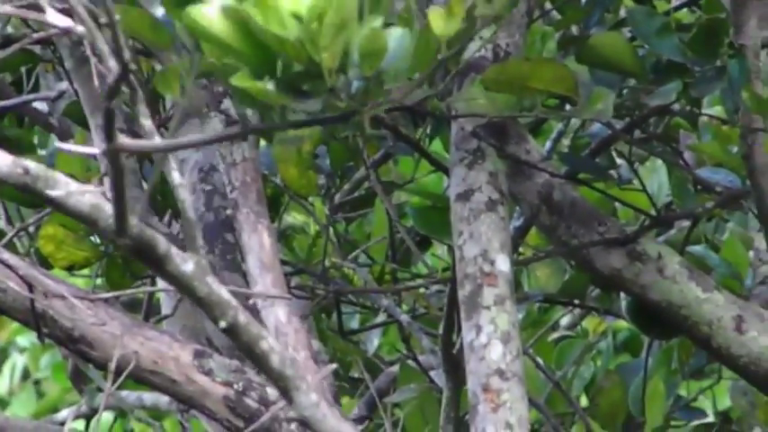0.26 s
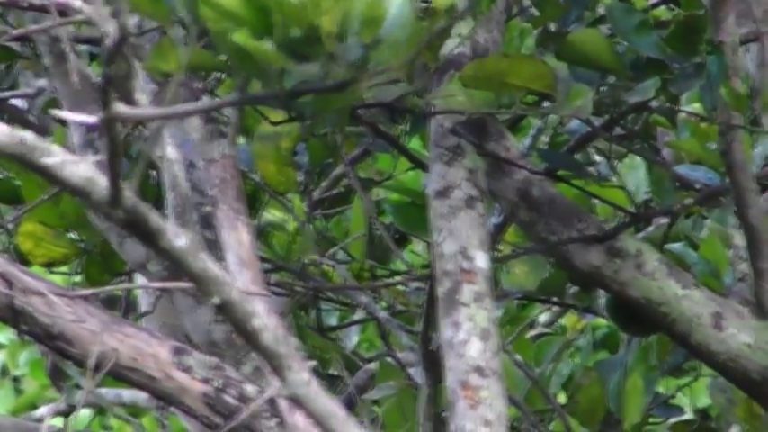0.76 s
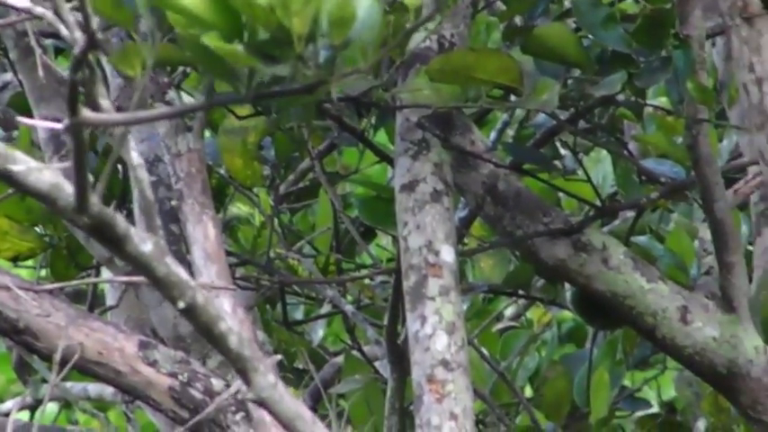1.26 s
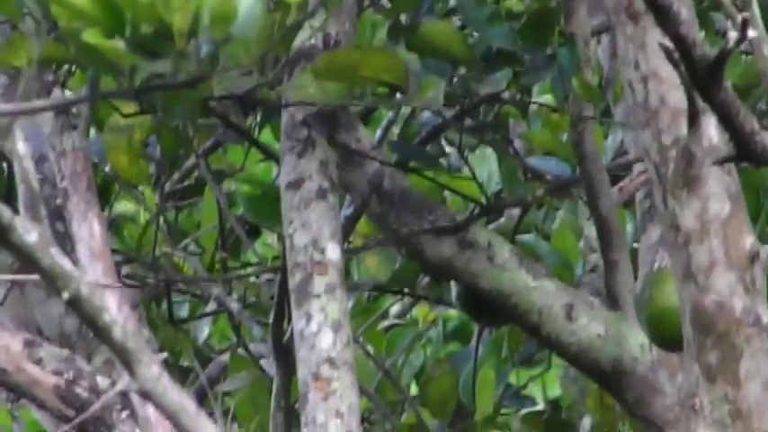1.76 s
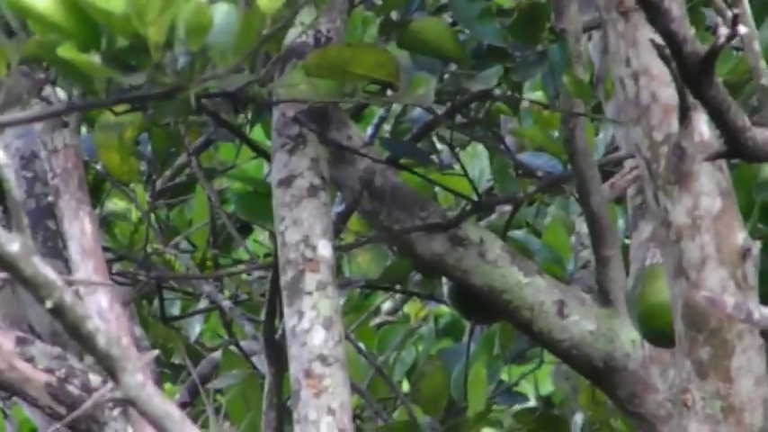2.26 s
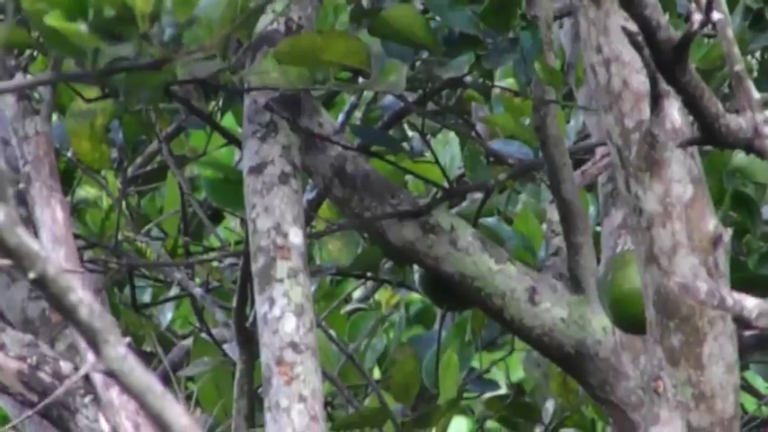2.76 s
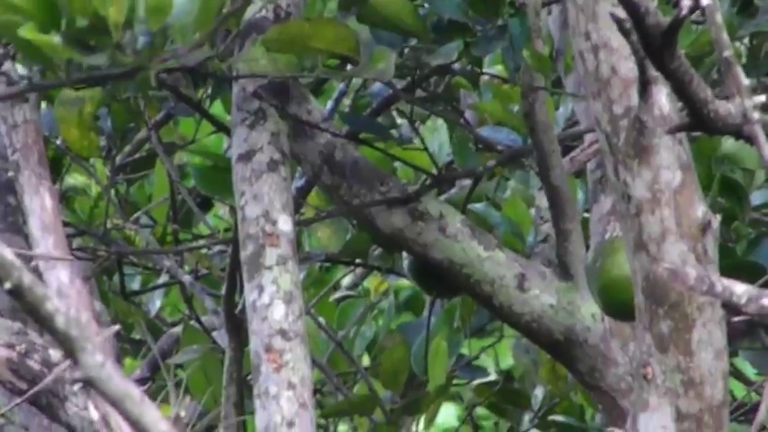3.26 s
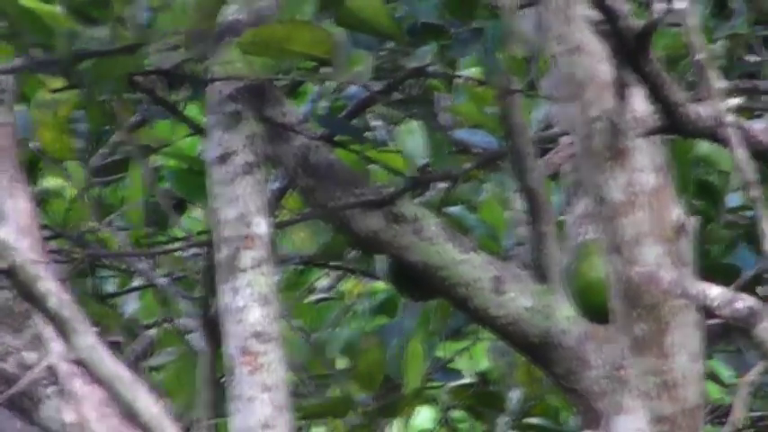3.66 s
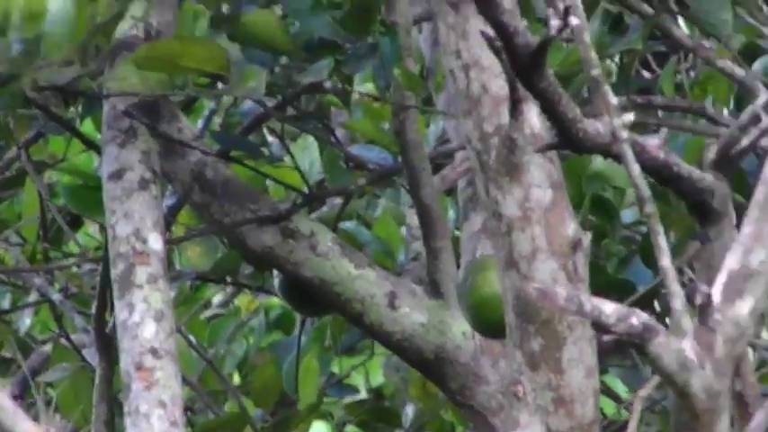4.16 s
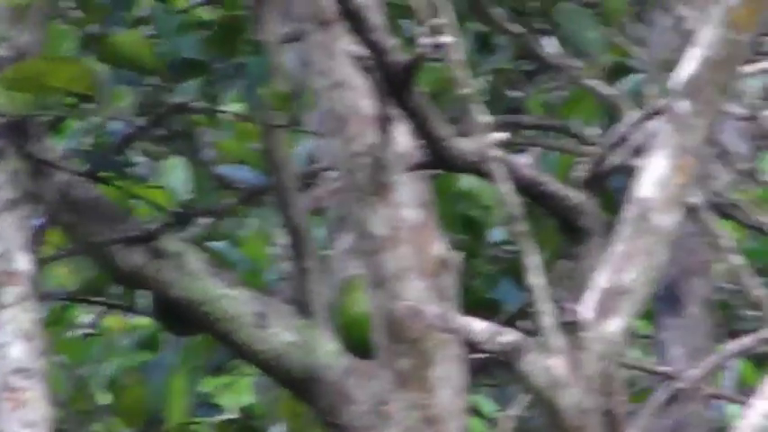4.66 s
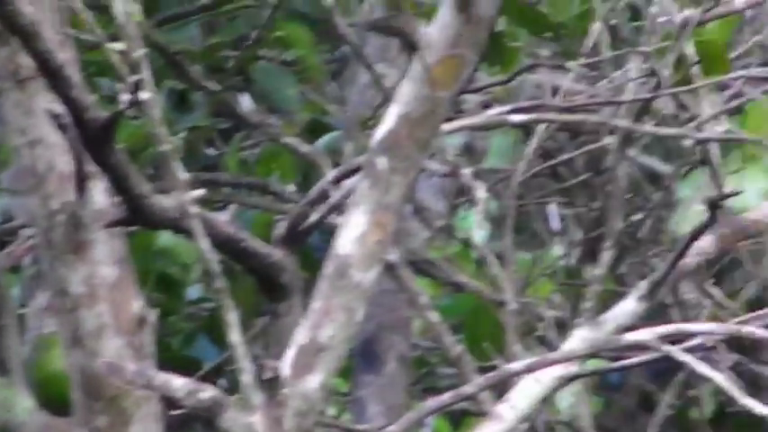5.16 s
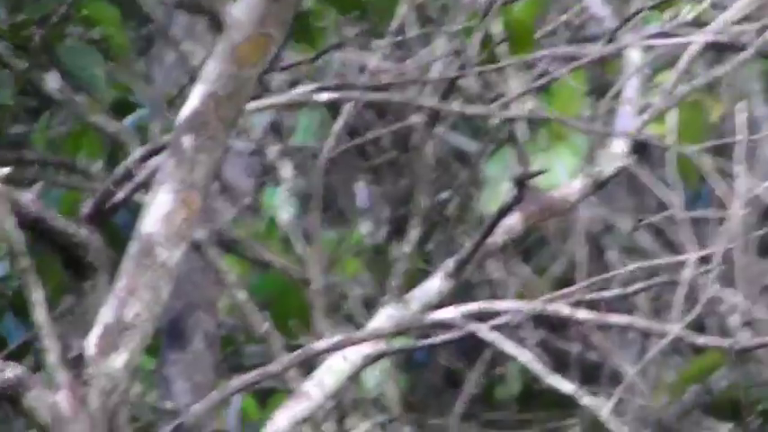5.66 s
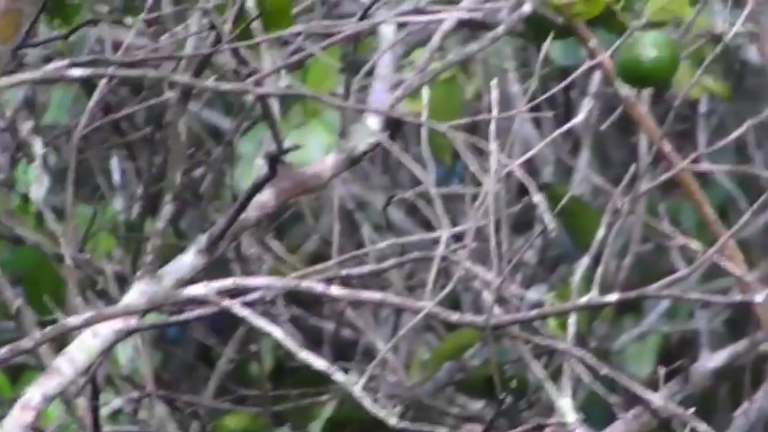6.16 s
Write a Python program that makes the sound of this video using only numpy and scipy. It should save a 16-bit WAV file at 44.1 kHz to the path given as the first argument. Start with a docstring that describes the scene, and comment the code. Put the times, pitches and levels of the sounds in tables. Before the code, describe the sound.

Insects drone in a garden while a small bird chatters and chips, a jay squawks four times and twigs snap.

```python
"""A small bird chips and chatters some way off; then a blue jay gives four harsh, falling calls.
The membranes of the jay's syrinx make a stack of harmonics, roughened by irregular vibration.
Twigs snap, one dull, dry click sounds close by, and the bird's last chip opens with a sharp click.
Garden trunks and foliage scatter these sounds; behind them insects drone in one high band,
over the low rush of the neighbourhood."""
import sys
import numpy as np
from scipy import signal
from scipy.fft import rfft, irfft
from scipy.io import wavfile

SR = 44100
rng = np.random.default_rng(int(sys.argv[2]) if len(sys.argv) > 2 else 0)


def file_out(sig):
    """Save sig as 16-bit WAV at sys.argv[1]."""
    # one column per channel
    cols = np.atleast_2d(sig).T
    # limit, then scale
    lim = np.clip(cols, -1, 1)
    pcm = np.round(lim * 32767).astype(np.int16)
    wavfile.write(sys.argv[1], SR, pcm)


N = 282681
T = np.arange(N) / SR


def jay():
    """Voiced sound: four calls, each a separate burst of oscillation in the syrinx."""
    # (start [s], length [s], first pitch [Hz], last pitch [Hz], glide exponent [1], level [dB],
    #  swell time [s], upper harmonics [dB], first push [dB], second push [dB],
    #  time of the voice crack [s], crack depth [0-1])
    calls = [(1.12, 0.28, 828.3, 727.3, 1.2, -32.5, 0.026, 1, 2.3, 0, 1.255, 0.68),
             (2.091, 0.28, 859.5, 706, 1.08, -31.5, .02, -1.5, 3.5, 3, 2.199, 0.98),
             (3.781, .277, 831.5, 734.3, 1.9, -32.5, 0.011, -5, .5, 3.5, 3.865, 0.41),
             (5.012, 0.28, 805, 741, 1.01, -33, 0.017, -2.5, 1, 3.5, 5.135, .35)]
    out = np.zeros(N)
    for start, *settings in calls:
        add(out, start, syrinx(start, *settings))
    return out


def syrinx(start, length, first_hz, last_hz, bow, call_db, swell_s, bright_db,
           first_db, second_db, crack_s, crack_depth, buzz_hz=235, doubling_s=0.056):
    """Self-sustained oscillation: membranes give falling harmonics, harsh where the cycle is irregular."""
    # harmonics 2 to 11, the throat tuned along with the pitch: (level [dB], relative rasp [dB])
    harmonics = [(-13, -15), (-13, -11), (1, -11), (-13.5, 1), (-10, -3), (-9, -19), (-3.5, -4.5),
                 (-16.5, 3), (-26.5, -9.5), (-37.5, 7)]
    age = T[:int(length * SR)]
    size, left = len(age), length - age
    # the call swells, is pushed twice and fades; a crack is a brief loss of voice, most of all on top
    first_push, second_push = [np.exp(-((age / length - at) / 0.089) ** 2) for at in (0.27, 0.73)]
    crack = crack_depth * np.exp(-((start + age - crack_s) / 0.017) ** 2)
    level_db = call_db - 14 * np.exp(-age / swell_s) - 5 * np.exp(-left / 0.024)
    level_db = level_db + first_db * first_push + second_db * second_push - 7 * crack
    upper_db = bright_db + 3.5 * (first_push + second_push) - 10 * crack
    # the membranes buzz before they lock and at the crack, and lose their grip as the air runs out
    unsettled = np.exp(-age / 0.032) + crack ** 2
    roughness = 0.5 + 1.4 * unsettled + 1.5 * np.exp(-left / 0.045)
    buzz_phase = 2 * np.pi * np.cumsum(buzz_hz * (1 + 0.12 * wander(66, size))) / SR
    pitch = first_hz + (last_hz - first_hz) * (age / length) ** bow
    pitch *= 1 + 0.13 * (crack > 0.7)  # a deep crack flips the pitch up
    jitter = 0.014 * roughness * wander(260, size)
    waver = 0.0062 * wander(40, size)
    pitch *= 1 + jitter + waver
    phase = 2 * np.pi * np.cumsum(pitch) / SR + 0.59 * unsettled * np.sin(buzz_phase)
    # period doubling: the call starts an octave up, then the odd harmonics grow in
    odd_gain = 1 / (1 + np.exp((doubling_s - age) / 0.0076))
    voice = np.zeros(size)
    for k, (db, rasp_db) in enumerate(harmonics, 2):
        gain = from_db(db + np.interp(k * pitch, [4900, 6000], [0, 1]) * upper_db)
        flicker_db = 2.5 * k * first_hz / 6000 * (wander(28, size) - 0.5)  # high harmonics flicker most
        tone = from_db(flicker_db) * np.sin(k * phase) * (odd_gain if k % 2 else 1)
        rasp = from_db(rasp_db) * roughness * narrow_noise(k * phase, spread_hz=360)
        voice += gain * (tone + rasp)
    gate = np.clip(age / 0.0033, 0, 1) * np.clip(left / 0.0053, 0, 1)
    shimmer = 1 + 0.18 * roughness * wander(90, size)
    return voice * from_db(level_db) * gate * shimmer


def chatter(note_s=0.023, overtone_hz=6950):
    """Random modulation widens each short note into a rough tone with a scratchy skirt and overtone."""
    out, t = np.zeros(N), T[:int(note_s * SR)]
    window = np.sin(np.pi * t / note_s) ** 2
    for time, hz, db in chatter_notes():
        phase = 2 * np.pi * hz * t
        tone = narrow_noise(phase, spread_hz=260)
        scratch = from_db(-3) * narrow_noise(phase, spread_hz=1200)
        overtone = from_db(-9) * narrow_noise(2 * np.pi * overtone_hz * t, spread_hz=480)
        add(out, time - note_s / 2, from_db(db) * (tone + scratch + overtone) * window)
    return out


def chatter_notes(max_notes=14, gap_growth=1.016, jitter_s=0.0018, uneven_db=1.2):
    """Nearly periodic pulse trains that slow a little; yields (time [s], pitch [Hz], level [dB])."""
    # the small bird's runs: (start [s], end [s], first gap [s], pitch [Hz], level [dB], fade [dB])
    runs = [(0.056, .49, .048, 4124, -47.5, 4.5), (0.852, 1.09, 0.044, 3950, -44, 9),
            (1.616, 2.08, .047, 4480, -48.5, -0.5), (2.911, 3.29, 0.039, 4625, -46.5, 4),
            (3.334, 3.76, .049, 4550, -47, 2), (4.669, 4.98, 0.04, 4470, -47.5, 4.5)]
    for start, end, gap, hz, db, fade_db in runs:
        gaps = gap * gap_growth ** np.arange(max_notes)
        times = start + np.cumsum(gaps) - gaps
        for time, (early, loud) in zip(times, rng.standard_normal((max_notes, 2))):
            if time < end:
                progress = (time - start) / (end - start)
                yield time - jitter_s * early, hz, db - fade_db * progress + uneven_db * loud


def chips(start_hz=7800, fall_s=0.00505, attack_s=0.0019):
    """Frequency modulation: thin, rough notes glide quickly down and decay exponentially."""
    # the small bird's high notes: (time [s], level [dB], decay time [s], final pitch [Hz])
    notes = [(.052, -39, 0.058, 7070), (3.348, -38.5, 0.075, 6940), (4.32, -40, 0.013, 6980),
             (4.995, -44, 0.06, 6960), (5.743, -32.5, 0.015, 6120)]
    out, t = np.zeros(N), T[:SR // 2]
    for time, db, decay_s, end_hz in notes:
        pitch = end_hz + (start_hz - end_hz) * np.exp(-t / fall_s)
        note = narrow_noise(2 * np.pi * np.cumsum(pitch) / SR, spread_hz=480)
        envelope = np.exp(-t / decay_s) * (1 - np.exp(-t / attack_s))
        add(out, time, from_db(db) * note * envelope)
    return out


def snaps_and_clicks(burst_s=0.0054, middle_db=-7):
    """Impulsive excitation: a brief noise burst rings broad modes; far sounds carry more echo."""
    # twig snaps, a dull, dry click close by (1.67 s) and the sharp onset of the last chip (5.748 s):
    # (time [s], direct peak [dB], low body [dB], crisp top [dB], relative echo [dB])
    events = [(0.923, -32.5, -9.5, -5.5, 4), (1.67, -28.5, -9.5, -18, -9.5), (4.535, -38.5, -11, -16, 0),
              (5.748, -27.5, -11.5, -5, 1), (5.842, -34, -11, -16.5, 1), (6.045, -20, -8, -11, -6),
              (6.061, -26.5, -25, -12, -5), (6.24, -28.5, -10, -11, 0), (6.291, -35.5, 1, -22, -14),
              (6.311, -37, -7.5, -9, -1)]
    # damped modes: (frequency [Hz], bandwidth [Hz], level [dB])
    modes = [(1073, 270, 1.5), (2330, 930, -0.5), (3540, 1150, -1.5), (4820, 1440, -1), (6460, 650, 0.5)]
    direct, scattered, t = np.zeros(N), np.zeros(N), T[:SR // 20]
    for time, peak_db, body_db, top_db, echo_db in events:
        burst = rng.standard_normal(len(t)) * np.exp(-t / burst_s)
        colour = [(2300, body_db), (3700, middle_db), (6000, top_db)]
        click = sum((-1) ** k * from_db(mode_db + at_hz(colour, hz)) * resonate(burst, hz, width)
                    for k, (hz, width, mode_db) in enumerate(modes))
        click = from_db(peak_db) * click / np.abs(click).max()
        add(direct, time, click)
        add(scattered, time, from_db(echo_db) * click)
    return direct + garden_echoes(scattered, near_db=-1, far_db=-0.5)


def insects(level_db=-52.5, tremble_db=1.0):
    """Incoherent summation: many insects merge into one narrow noise band with a fine tremble."""
    # spectrum of the chorus: (frequency [Hz], relative spectral density [dB])
    spectrum = [(3500, -31), (4500, -36), (4900, -6), (5150, -1.5), (5330, -0.5), (5600, -6), (6000, -19.5),
                (7300, -17.5), (9000, -45.5)]
    return from_db(level_db + tremble_db * wander(70, N)) * coloured_noise(spectrum, N)


def neighbourhood(level_db=-48.5):
    """Stationary noise: far traffic and air blend into a steady, low rush."""
    # spectrum of the rush: (frequency [Hz], relative spectral density [dB])
    spectrum = [(18, -71), (30, -18), (59, -17.5), (79, -5), (161, -0.5), (194, -2.5), (224, -0.5),
                (404, -6), (668, -6), (773, -8), (1180, -13.5), (1360, -17.5), (3220, -25), (4500, -24.5),
                (5850, -62.5), (9900, -120)]
    return from_db(level_db) * coloured_noise(spectrum, N)


def garden_echoes(x, near_db, far_db, near_t60_s=0.32, far_t60_s=0.71, echoes_per_s=1500):
    """Scattering: nearby trunks return sparse echoes, the trees around a long, diffuse tail."""
    t = T[:SR]
    trunks = rng.standard_normal(SR) * (rng.random(SR) < echoes_per_s / SR)
    trunks *= from_db(-60 * t / near_t60_s) * (t > 0.004)
    # diffraction: long waves pass the branches by
    trunks = signal.sosfilt(signal.butter(2, 1700, "high", fs=SR, output="sos"), trunks)
    trees = rng.standard_normal(SR) * from_db(-60 * t / far_t60_s) * (1 - np.exp(-t / 0.051))
    trees = resonate(trees / np.linalg.norm(trees), hz=3700, width_hz=5300)
    response = from_db(near_db) * trunks / np.linalg.norm(trunks) + from_db(far_db) * trees
    return signal.fftconvolve(x, response)[:N]


def narrow_noise(phase, spread_hz):
    """Quadrature modulation: a band of noise follows a carrier and is heard as a rough tone."""
    size = len(phase)
    return (wander(spread_hz, size) * np.sin(phase) + wander(spread_hz, size) * np.cos(phase)) / np.sqrt(2)


def coloured_noise(spectrum, size):
    """Spectral shaping: noise of unit power that falls steeply past the spectrum's last point."""
    hz = np.arange(size // 2 + 1) * SR / size
    roll_off = 1 / np.sqrt(1 + (hz / spectrum[-1][0]) ** 20)
    white = rfft(rng.standard_normal(size))
    return unit_rms(irfft(white * from_db(at_hz(spectrum, hz)) * roll_off, size))


def wander(rate_hz, size):
    """Low-pass noise: random motion of unit power up to about the given rate."""
    low_pass = signal.butter(2, rate_hz, fs=SR, output="sos")
    return unit_rms(signal.sosfilt(low_pass, rng.standard_normal(size + SR // 10))[-size:])


def resonate(x, hz, width_hz):
    """Damped resonance: a two-pole band-pass with unit gain at its peak."""
    r = np.exp(-np.pi * width_hz / SR)
    feedback = [1, -2 * r * np.cos(2 * np.pi * hz / SR), r * r]
    return signal.lfilter(np.array([1, 0, -1]) * (1 - r * r) / 2, feedback, x)


def at_hz(spectrum, hz):
    """Interpolation of (frequency [Hz], level [dB]) points on a logarithmic frequency axis."""
    frequencies, db = np.transpose(spectrum)
    return np.interp(np.log(np.maximum(hz, 1)), np.log(frequencies), db)


def from_db(db):
    """Amplitude ratio of a level in decibels."""
    return 10 ** (np.asarray(db) / 20)


def unit_rms(x):
    """Normalisation to unit power."""
    return x / np.sqrt(np.mean(x ** 2) + 1e-20)


def add(out, time, sound):
    """Superposition of a sound from a given time [s]."""
    at = max(int(time * SR), 0)
    out[at:at + len(sound)] += sound[:N - at]


def scene():
    """Superposition: birds, snaps and clicks, each with its echoes, add to the steady background."""
    calls, runs, high_notes = jay(), chatter(), chips()
    calls += garden_echoes(calls, near_db=2, far_db=-6.5)
    runs += garden_echoes(runs, near_db=-3, far_db=-5.5)
    high_notes += garden_echoes(high_notes, near_db=-4.5, far_db=-4.5)
    return (calls + runs + high_notes + snaps_and_clicks() + insects() + neighbourhood())[None]


def record(dry, notch_hz=8020, notch_width_hz=620, cutoff_hz=8800):
    """Band limiting: the microphone path has a notch near its top, then a steep low-pass."""
    notched = dry - resonate(dry, notch_hz, notch_width_hz)
    notched = notched - resonate(notched, notch_hz, notch_width_hz)
    return signal.sosfilt(signal.ellip(10, 0.2, 80, cutoff_hz, fs=SR, output="sos"), notched)


dry = scene()
out = record(dry)
file_out(out)
```